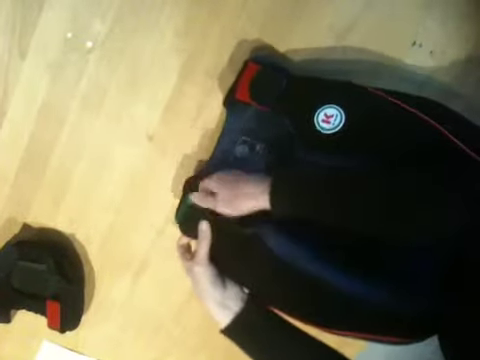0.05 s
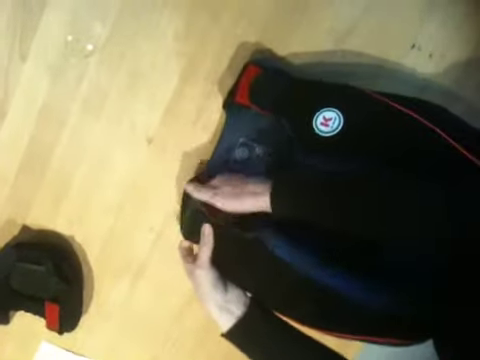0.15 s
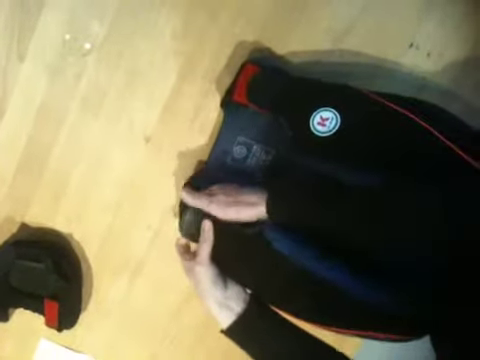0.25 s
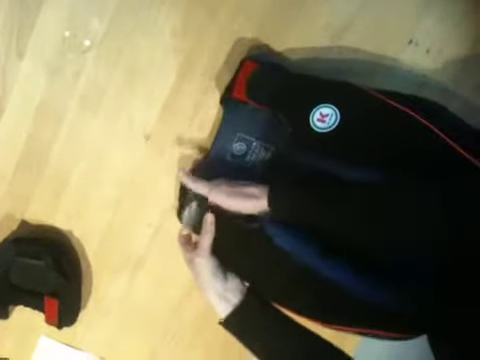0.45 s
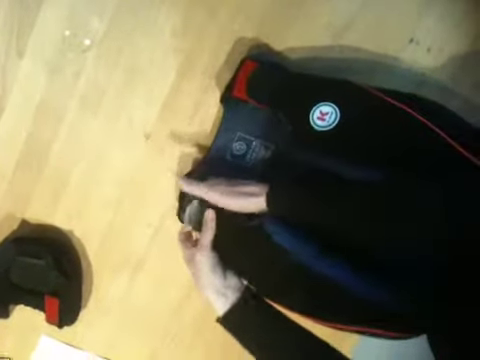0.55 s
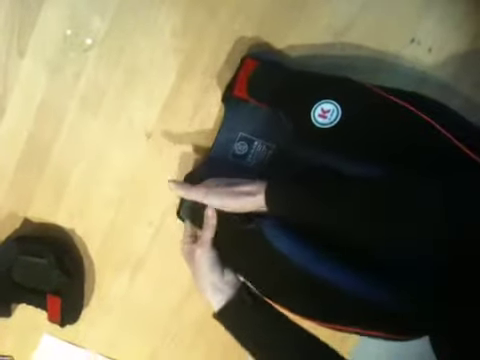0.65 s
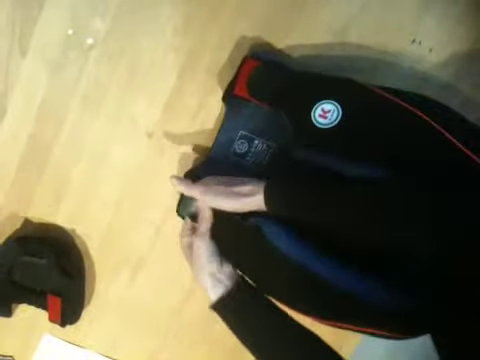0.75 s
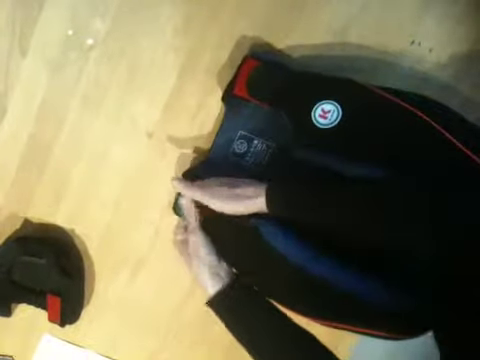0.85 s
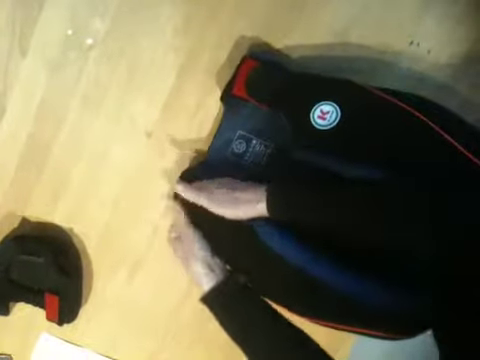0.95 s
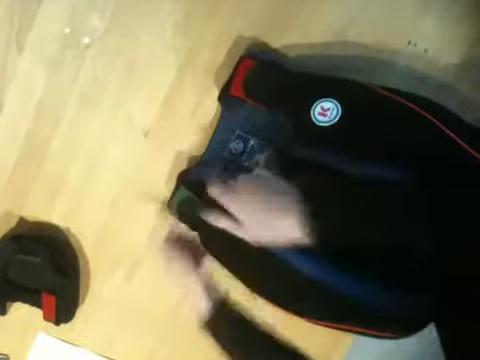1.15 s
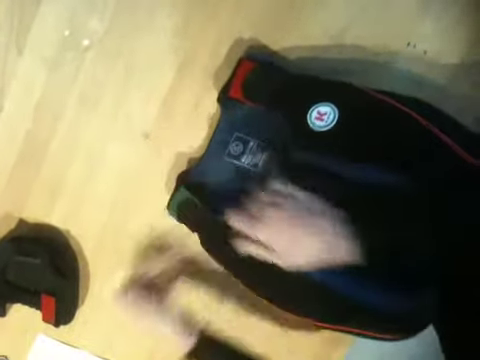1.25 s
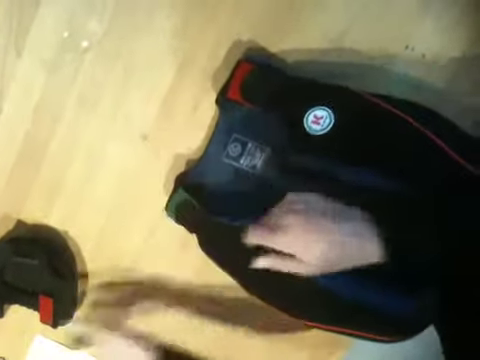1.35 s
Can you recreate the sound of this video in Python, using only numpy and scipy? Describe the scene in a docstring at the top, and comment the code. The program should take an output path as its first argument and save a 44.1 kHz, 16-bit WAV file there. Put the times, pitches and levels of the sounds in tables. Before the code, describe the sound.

In a small, slightly echoing room, a plastic catch clicks lightly, creaks and snaps home with a muffled knock against wood. Then come scattered weaker clicks and the faint rub of padded fabric being handled.

```python
"""Light clicks and a rustle of fabric come first, as hands press a plastic fastener on a padded protector
lying on wood in a small room. The catch creaks, slips over its ridge in a quick run of clicks and seats
with a dull knock. Each slip is an impulse that excites damped resonances of the plastic. Lighter clicks
and the friction of fibres follow as the fingers let go; the room reverberates briefly after each."""
import sys
import numpy as np
from scipy import signal
from scipy.fft import rfft, irfft
from scipy.io import wavfile

SR = 44100
rng = np.random.default_rng(int(sys.argv[2]) if len(sys.argv) > 2 else 0)


def transcribe(u):
    """Save the signal u as a 16-bit wav file named by the first command-line argument.

    u: samples, shape (n,) or (channels, n), limited to [-1, 1]; the rate is SR.
    q: integer samples, one column per channel.
    """
    v = np.clip(np.atleast_2d(u).T, -1, 1)
    q = np.round(v * 32767).astype(np.int16)
    wavfile.write(sys.argv[1], SR, q)


N = 61739

# Spectrum of the steady room noise: (frequency [Hz], relative level [dB])
NOISE_SPECTRUM = [(25, -4), (55, -16), (85, 4.5), (150, -1), (220, -0.5), (360, 3), (600, -2), (850, -6.5),
                  (2300, -8.5), (3400, -9), (5500, -11), (13000, -17), (15200, -1), (16000, -14.5)]
# Faint tones of the room: (frequency [Hz], level [dB])
ROOM_TONES = [(318, -79.5), (620, -80)]
# Reverberation: (frequency [Hz], time to fall 60 dB [s], gain [dB])
REVERBERATION = [(121, 0.57, 6), (190, 0.34, -0.5), (320, 0.41, 0), (706, 0.48, 6), (1010, 0.36, -4.5),
                 (1320, 0.59, -3.5), (2020, 0.47, -10.5), (5530, 0.38, -2), (7700, .43, -4.5),
                 (14200, 0.32, -17)]
# Discrete reflection: (delay [s], gain [dB])
REFLECTIONS = [(0.0169, -16.5)]
# Strokes on the fabric: (centre time [s], half length [s], level [dB], tilt above 1 kHz [dB/octave])
HAND_STROKES = [(0.083, .041, -59.5, -1), (0.165, 0.019, -61.5, 3), (0.586, 0.03, -56, -0.5),
                (.777, .084, -71, 4), (0.89, 0.057, -58, 7.5), (0.99, 0.073, -60.5, 3.5),
                (1.074, 0.06, -59.5, 4), (1.186, 0.057, -64, 1), (1.293, .024, -60.5, 3.5)]
# Spectrum of rubbed fabric: (frequency [Hz], relative level [dB])
FABRIC_SPECTRUM = [(200, -7.5), (900, -4.5), (2200, 13), (4000, 2), (7000, 2.5), (11000, -0.5), (13000, -8),
                   (16000, -9.5)]
# Knocks through the padding into the wood: (time [s], level [dB])
PADDED_KNOCKS = [(.0556, -58), (.2100, -47), (.2520, -54), (.2681, -35.5)]
# Light clicks of plastic under the fingers: (time [s], ring frequency [Hz], ring level [dB],
# clack frequency [Hz], clack level [dB], tick level [dB])
FINGER_CLICKS = [(.0092, 2040, -48.5, 3240, -59, -56), (.0552, 2120, -34, 2950, -44, -47),
                 (.0992, 2150, -34.5, 2900, -64, -47.5), (.1484, 2570, -46.5, 4000, -69, -53),
                 (.182, 2450, -52, 5000, -68, -49.5), (0.5609, 2020, -44.5, 3680, -45, -38),
                 (0.5732, 2440, -50, 4400, -45.5, -49), (.5768, 2900, -61, 4200, -48, -51),
                 (0.5815, 2200, -45, 3820, -45, -42), (.6883, 2550, -56, 4300, -50, -49),
                 (.7340, 2740, -63, 4000, -54.5, -56), (.7510, 2470, -64, 5000, -63, -50),
                 (.8251, 2790, -57, 3800, -50.5, -42), (.9349, 2080, -32.5, 3220, -34, -41),
                 (.9420, 2180, -39, 3400, -62, -51), (.9468, 2400, -42.5, 3100, -54, -63),
                 (1.0232, 2930, -53, 3600, -39, -47), (1.052, 2510, -55, 4070, -48, -44.5),
                 (1.0630, 2400, -48, 3600, -50, -57), (1.0672, 2300, -41.5, 3800, -40, -41.5),
                 (1.0781, 2980, -58, 5870, -45.5, -63), (1.088, 1980, -50.5, 3580, -49, -65),
                 (1.1468, 2400, -57, 5230, -71, -45), (1.1580, 2280, -50, 3100, -50, -47),
                 (1.1996, 2180, -50.5, 4050, -54, -41), (1.252, 2520, -49.5, 4000, -50, -54)]
# The catch slipping home: (time [s], ring frequency [Hz], ring level [dB],
# clack frequency [Hz], clack level [dB], tick frequency [Hz], tick level [dB])
CATCH_SLIPS = [(.2063, 1720, -36, 5430, -47, 8300, -42), (.2096, 1650, -35.5, 4900, -35, 7800, -34),
               (.2247, 1800, -30, 4700, -44, 9400, -35), (.2370, 1820, -39, 5200, -53, 10000, -51),
               (.2405, 1940, -41, 5340, -47, 9600, -35), (.2502, 2030, -37, 5200, -45, 11000, -44),
               (.2516, 2050, -27.5, 5400, -32, 11400, -26), (.2580, 2200, -34, 3200, -38, 9600, -36),
               (.2634, 1900, -28.5, 3100, -36, 10600, -33), (.2654, 2080, -27, 4500, -32, 8000, -30),
               (.2662, 2150, -28, 5600, -34, 11000, -29), (.2688, 1920, -23.5, 2800, -27.5, 8600, -28.5)]
# Lingering modes of the fastener: (frequency [Hz], relative level [dB], time to fall 60 dB [s])
PLASTIC_MODES = [(1194, -3.5, 0.15), (1458, 4, 0.083), (1734, 10, 0.057), (1800, 5, 0.11), (2107, 13, 0.11),
                 (2294, 3, 0.037), (2987, -1, .07), (5305, -5, 0.046)]
# Microphone response: (frequency [Hz], gain [dB])
MIC_RESPONSE = [(25, -9), (60, -12.5), (100, -8), (170, 1), (280, -1), (8000, 0), (12000, -0.5),
                (13500, -2.5), (16000, -17.5)]


def amp(db):
    """Amplitude ratio: tenfold for every 20 dB."""
    return 10 ** (np.asarray(db) / 20)


def unit(x):
    """Normalisation to an rms of 1."""
    return x / np.sqrt(np.mean(x ** 2) + 1e-20)


def read(points, hz, column=1):
    """Interpolation of a table column over log frequency."""
    table = np.array(points, float)
    return np.interp(np.log(hz + 1), np.log(table[:, 0] + 1), table[:, column])


def add(mix, start_s, sound):
    """Superposition: a sound sums into the mix from its start time."""
    part = mix[max(round(start_s * SR), 0):][:len(sound)]
    part += sound[:len(part)]


def colour(x, spectrum, tilt_db=0):
    """Linear filtering by a spectrum, tilted per octave above 1 kHz."""
    hz = np.fft.rfftfreq(len(x), 1 / SR)
    octaves = np.log2(np.maximum(hz, 1000) / 1000)
    return irfft(rfft(x) * amp(read(spectrum, hz) + tilt_db * octaves), len(x))


def minimum_phase(gain):
    """Minimum phase gives the most compact causal pulse with a given spectrum."""
    log_gain = np.log(np.maximum(np.r_[gain, gain[-2:0:-1]], gain.max() * 1e-4))
    return np.fft.ifft(np.exp(np.conj(signal.hilbert(log_gain)))).real


def background(noise_db=-63.5, tone_width_hz=8.2):
    """Broadband room noise, with two narrow bands whose components beat as wavering tones."""
    hz = np.fft.rfftfreq(N, 1 / SR)
    tones = np.zeros(N)
    for centre, db in ROOM_TONES:
        band = np.exp(-((hz - centre) / tone_width_hz) ** 2)
        tones += amp(db) * unit(irfft(rfft(rng.standard_normal(N)) * band, N))
    return tones + amp(noise_db) * unit(colour(rng.standard_normal(N), NOISE_SPECTRUM))


def room_response(near_db=-2, wall_delay_s=0.01, early_db=2, early_decay_s=0.0053):
    """Impulse response: weak nearby scatter, a burst of wall echoes, then exponential decay by band."""
    hz, t, noise = signal.stft(rng.standard_normal(SR * 3 // 4), SR, nperseg=256)
    t60 = read(REVERBERATION, hz)[:, None]
    decay = amp(read(REVERBERATION, hz, column=2)[:, None] - 60 * t / t60)
    energy_norm = np.sqrt(2 * np.log(1000) / t60 / SR)
    tail = signal.istft(noise * decay * energy_norm, SR, nperseg=256)[1]
    since_wall = np.arange(len(tail)) / SR - wall_delay_s
    tail *= amp(np.where(since_wall < 0, near_db, early_db * np.exp(-abs(since_wall) / early_decay_s)))
    for delay_s, db in REFLECTIONS:
        add(tail, delay_s, amp([db]))
    return tail


def room(x, tails=4, step_s=0.0028, crossover_hz=800):
    """Decorrelation: the treble cross-fades through random tails, so rapid clicks reverberate smoothly."""
    low = signal.sosfilt(signal.butter(2, crossover_hz, fs=SR, output="sos"), x)
    high = signal.sosfilt(signal.butter(2, crossover_hz, "high", fs=SR, output="sos"), x)
    steps = np.arange(N) / SR / step_s
    parts = [low]
    for k in range(tails):
        fade_distance = abs((steps - k + tails / 2) % tails - tails / 2)
        parts.append(high * np.cos(np.pi / 2 * np.minimum(fade_distance, 1)))
    return sum(signal.fftconvolve(part, room_response())[:N] for part in parts)


def fabric(fibres_per_s=3600, spread_db=4, rub_gain=0.4):
    """Friction: fibres catch and release over a soft rub, swelling with each stroke of the hand."""
    out, t = np.zeros(N), np.arange(N) / SR
    for centre_s, half_s, db, tilt_db in HAND_STROKES:
        strength = amp(spread_db * np.minimum(rng.exponential(1, N), 4))
        released = rng.random(N) < fibres_per_s / SR
        grains = strength * released * rng.choice([-1, 1], N)
        friction = unit(grains) + rub_gain * rng.standard_normal(N)
        swell = np.exp(-((t - centre_s) / half_s) ** 2)
        out += amp(db) * swell * unit(colour(friction, FABRIC_SPECTRUM, tilt_db))
    return out


def knocks(hz=290, rise_s=0.0011, decay_s=0.0031):
    """Heavy damping: a blow through padding into wood dies in about two cycles."""
    out, t = np.zeros(N), np.arange(SR // 10) / SR
    envelope = (1 - np.exp(-t / rise_s)) * np.exp(-t / decay_s)
    thud = -2 * envelope * np.sin(2 * np.pi * hz * t)
    for start_s, db in PADDED_KNOCKS:
        add(out, start_s, amp(db) * thud)
    return out


RING_Q, TICK_Q, RESONANCE_CUT_HZ = 2.9, 2.1, 900
DISPERSION_S = 0.0005  # lag of the bass behind the highest treble


def click(ring_hz, ring_db, clack_hz, clack_db, tick_hz, tick_db, clack_q, push_db, trail_gain, trail_s):
    """Impulse excitation: a jolt and its trail of micro-slips drive three damped resonances."""
    size = 1024
    hz, t = np.fft.rfftfreq(size, 1 / SR) + 1, np.arange(size) / SR
    drive = trail_gain * unit(rng.standard_normal(size) * np.exp(-t / trail_s)) / np.sqrt(size)
    drive[0] += 1  # the jolt
    drive_power = abs(rfft(drive)) ** 2
    # The push gives a broad body between 260 Hz and the ring.
    push = amp(ring_db + push_db) / (1 + (hz / ring_hz) ** 2)
    power = push ** 2 * size / 2 / (1 + (260 / hz) ** 4)
    resonances = (ring_hz, RING_Q, ring_db), (clack_hz, clack_q, clack_db), (tick_hz, TICK_Q, tick_db)
    for centre, q, db in resonances:
        detuning = q * (hz / centre - centre / hz)
        peak = 1 / (1 + detuning ** 2 / 2) ** 2 / (1 + (RESONANCE_CUT_HZ / hz) ** 4)
        power += amp(db) ** 2 * peak / np.mean(peak * drive_power) * SR / 1000
    group_delay = DISPERSION_S * (1 - hz / hz[-1])
    dispersion = np.exp(-2j * np.pi * np.cumsum(group_delay) * SR / size)
    pulse = irfft(rfft(minimum_phase(np.sqrt(power))) * dispersion)
    return signal.fftconvolve(drive, pulse)


def fastener(modes_db=-25, finger_tick_hz=9600):
    """Stick-slip: the catch jerks home and leaves its modes ringing, amid lighter handling clicks."""
    out, t = np.zeros(N), np.arange(SR // 4) / SR
    for start_s, ring_hz, ring_db, *clack_and_tick in CATCH_SLIPS:
        slip = click(ring_hz, ring_db, *clack_and_tick,
                     clack_q=2.2, push_db=-14, trail_gain=0.9, trail_s=0.0013)
        add(out, start_s - DISPERSION_S / 2, slip)
        for hz, db, t60 in PLASTIC_MODES:
            envelope = amp(ring_db + modes_db + db - 60 * t / t60)
            add(out, start_s, envelope * np.sin(2 * np.pi * (hz * t + rng.random())))
    for start_s, *ring_and_clack, tick_db in FINGER_CLICKS:
        # Before the catch closes, the fingers press it hard into the padding.
        push_db = -18 if start_s < CATCH_SLIPS[0][0] else -31
        add(out, start_s, click(*ring_and_clack, finger_tick_hz, tick_db,
                                clack_q=2.9, push_db=push_db, trail_gain=0.73, trail_s=0.00094))
    return out


def scene():
    """Superposition of direct sound, reverberation and steady background."""
    direct = fastener() + knocks() + fabric()
    return (direct + room(direct) + background())[None]


def record(dry):
    """Frequency response: the microphone rolls off bass and treble, ahead of a 16.3 kHz band limit."""
    band_limit = signal.firwin(511, 16300, window=("kaiser", 9), fs=SR)
    return signal.oaconvolve(colour(dry[0], MIC_RESPONSE), band_limit, "same")[None]


dry = scene()
out = record(dry)
transcribe(out)
```